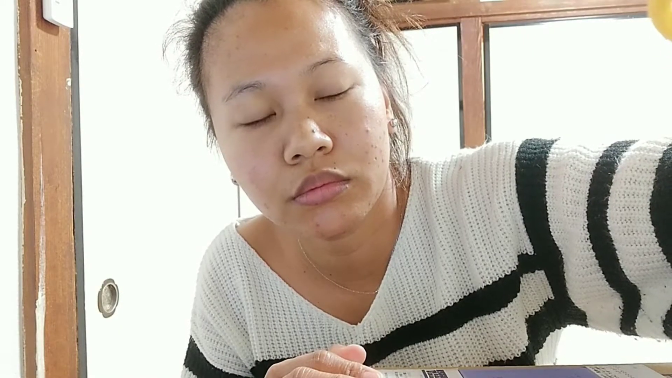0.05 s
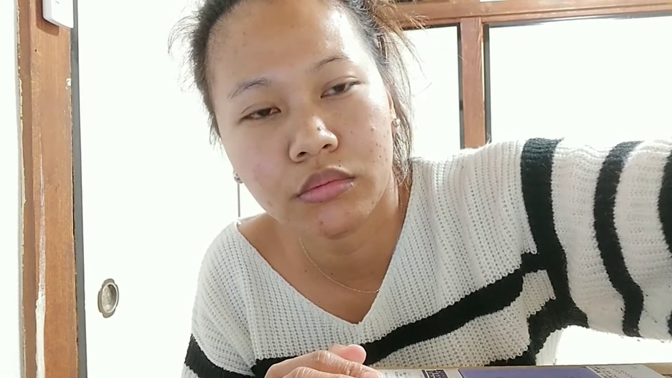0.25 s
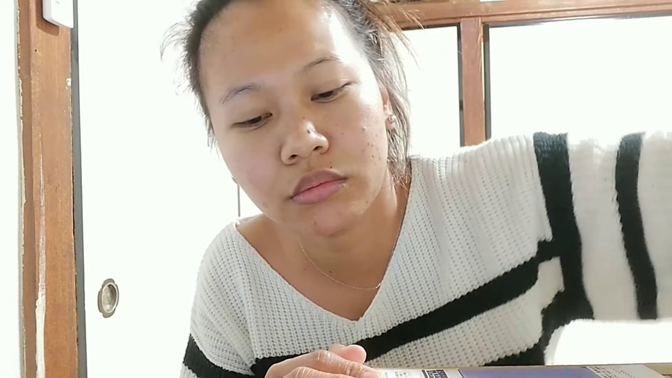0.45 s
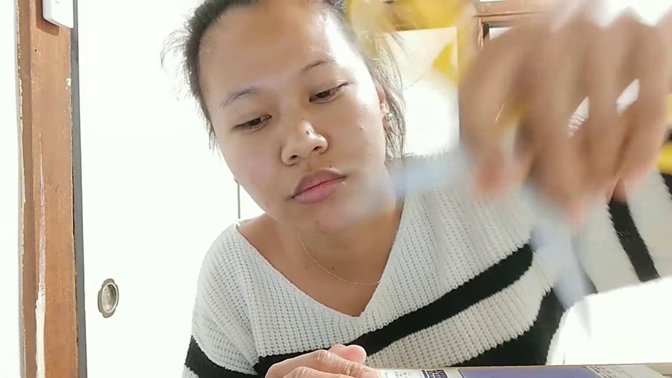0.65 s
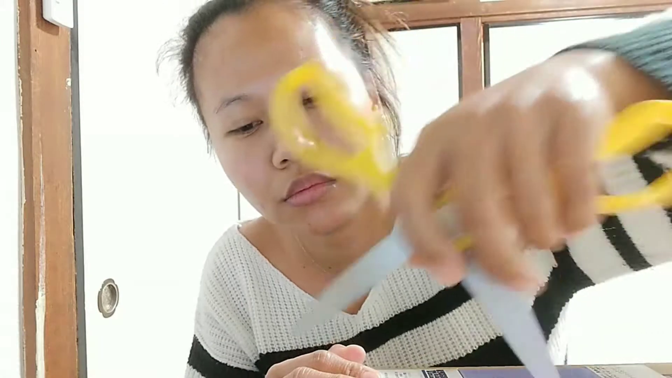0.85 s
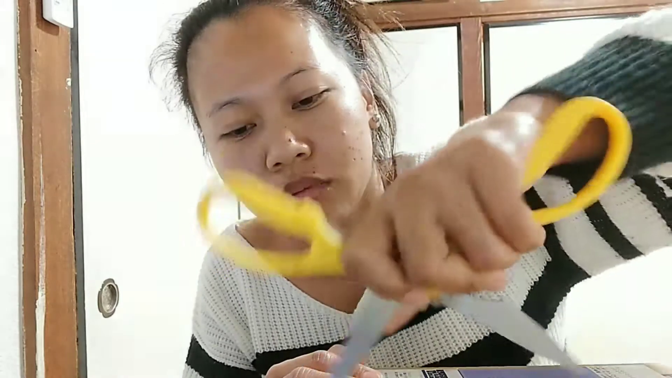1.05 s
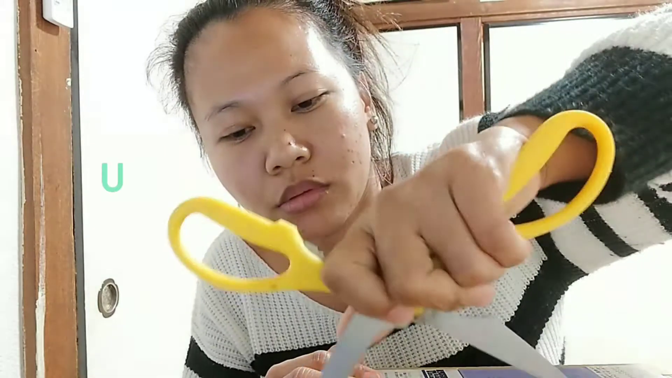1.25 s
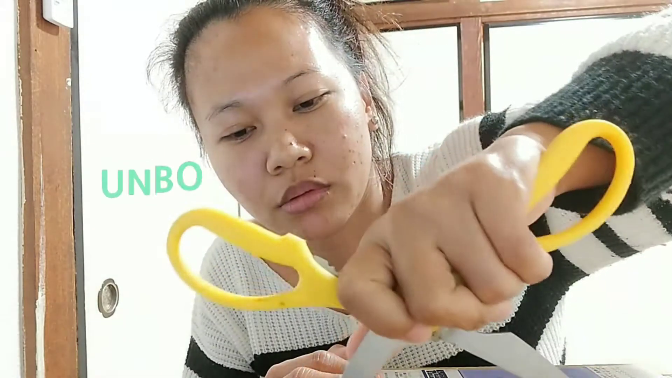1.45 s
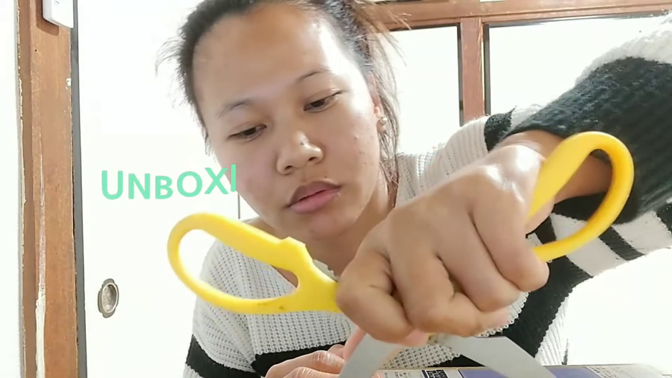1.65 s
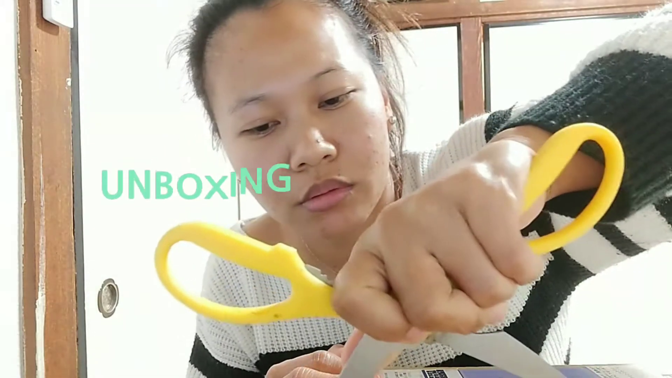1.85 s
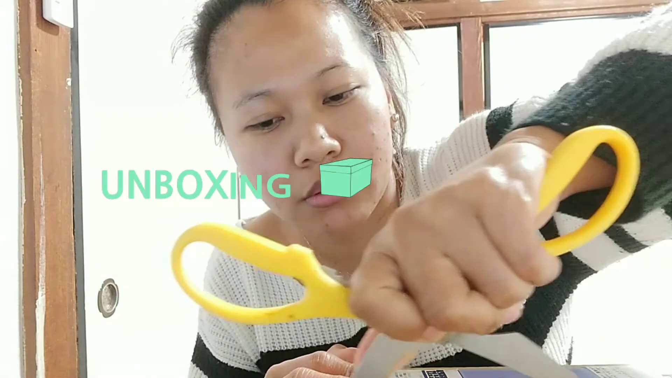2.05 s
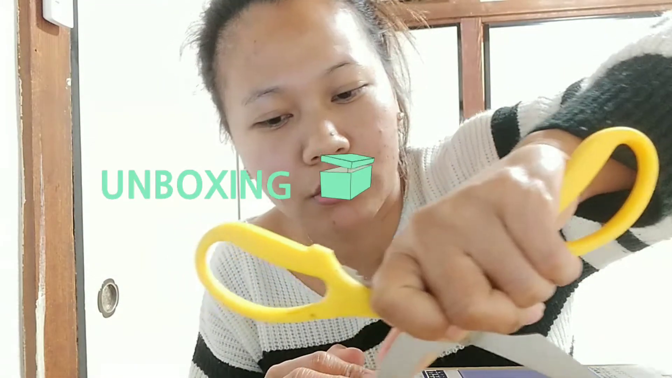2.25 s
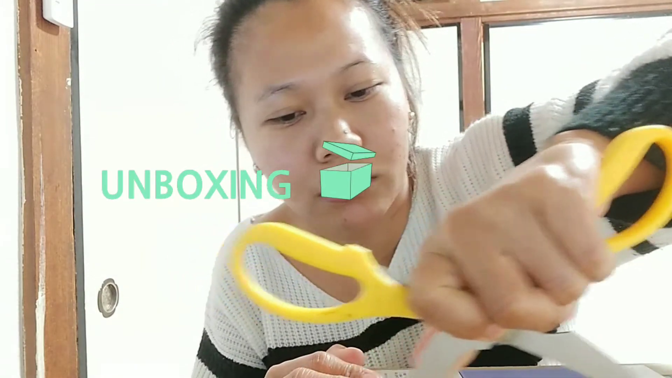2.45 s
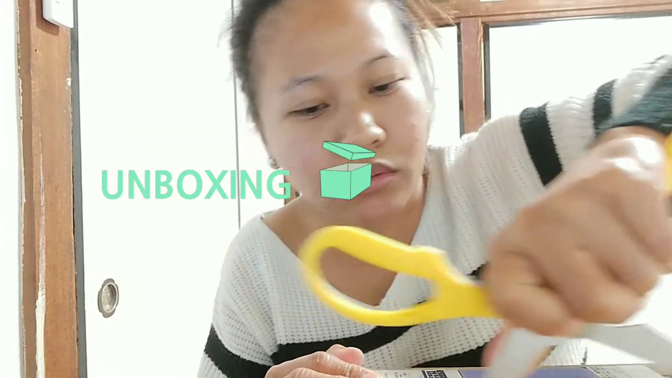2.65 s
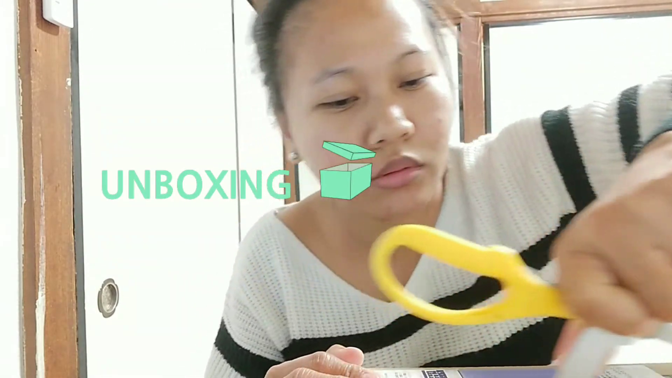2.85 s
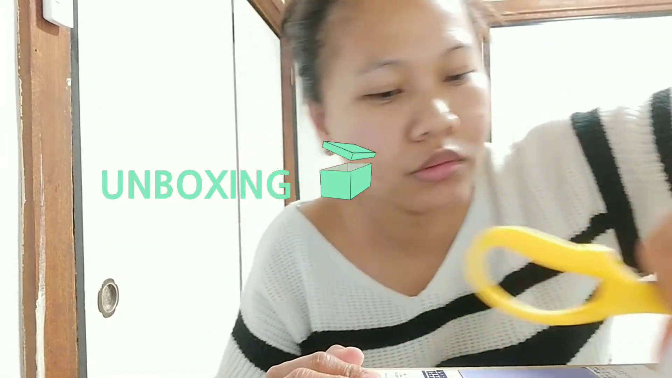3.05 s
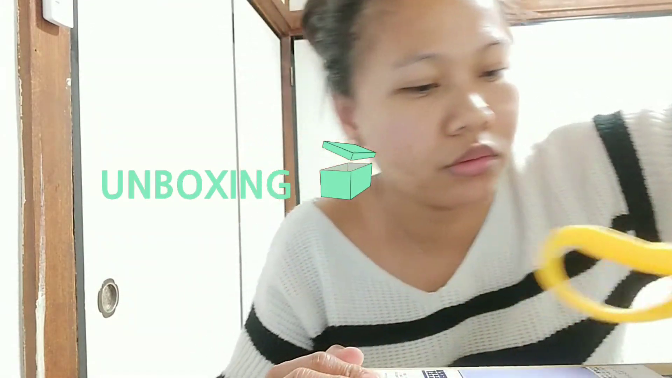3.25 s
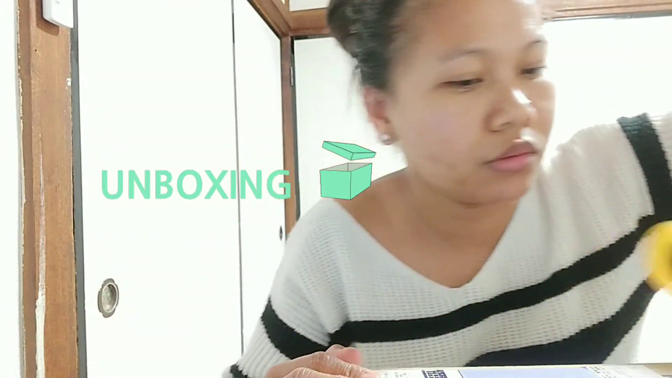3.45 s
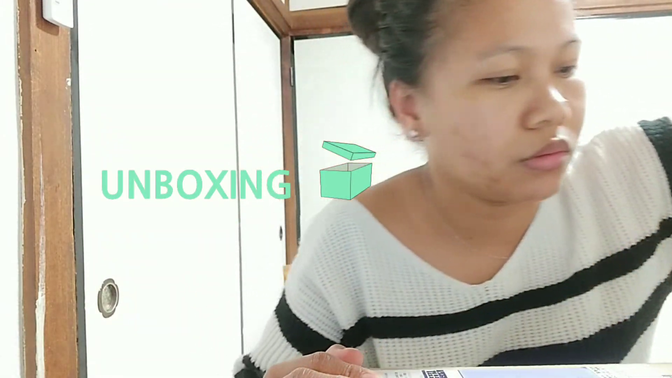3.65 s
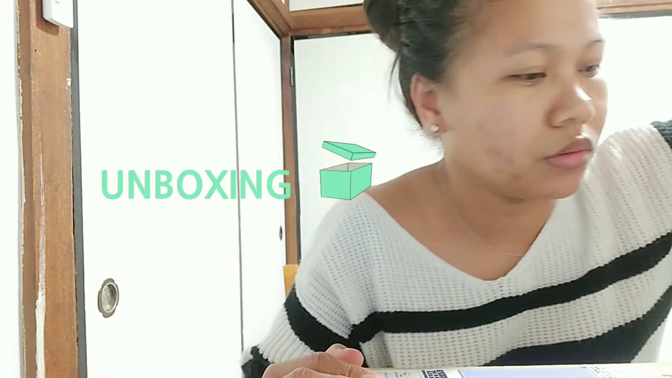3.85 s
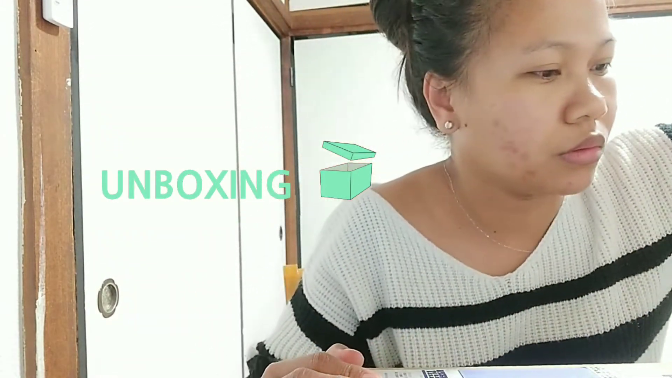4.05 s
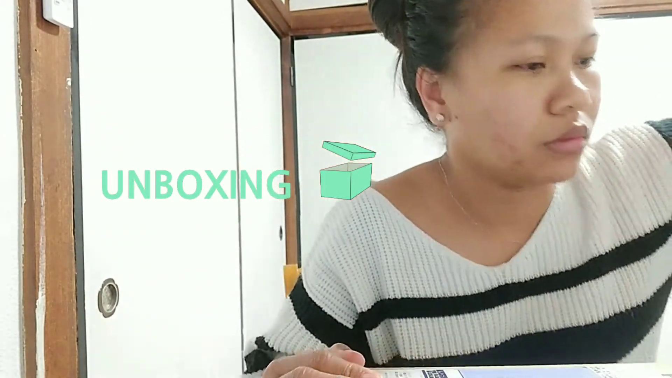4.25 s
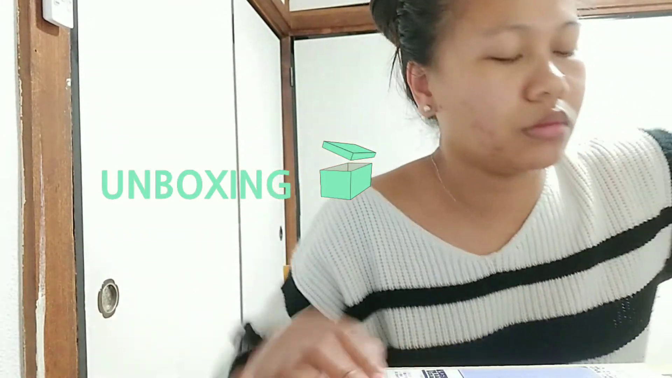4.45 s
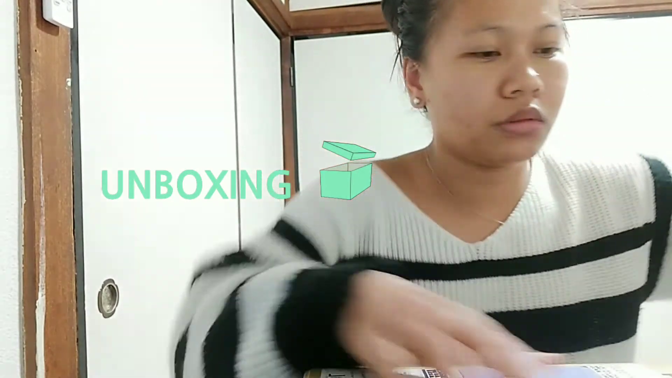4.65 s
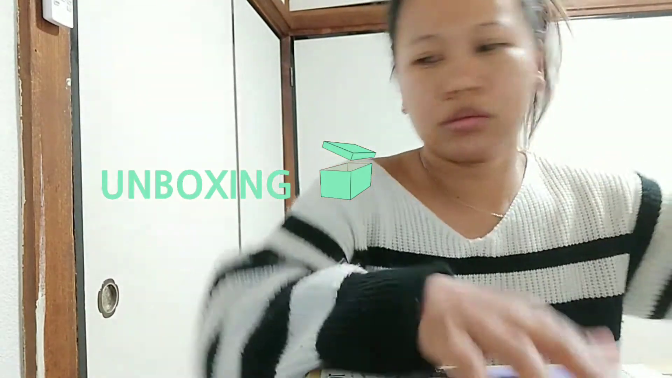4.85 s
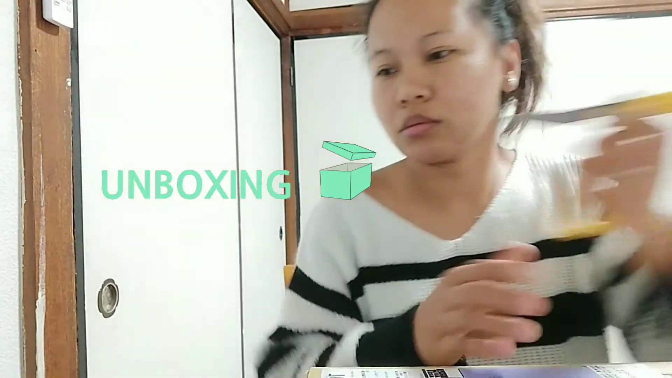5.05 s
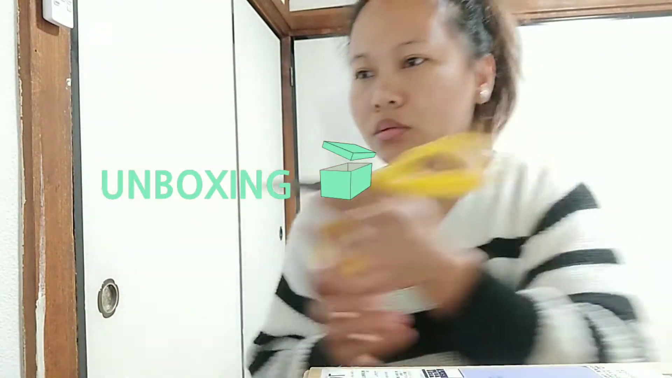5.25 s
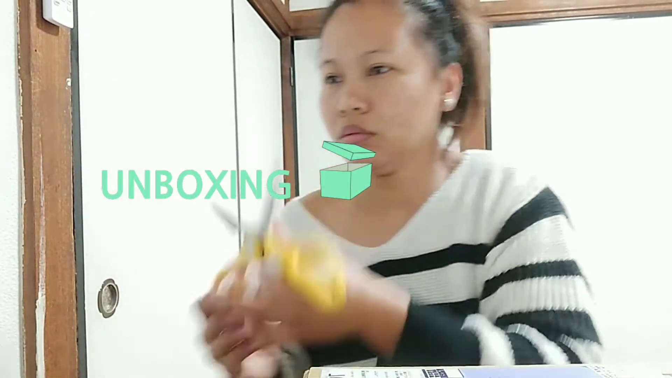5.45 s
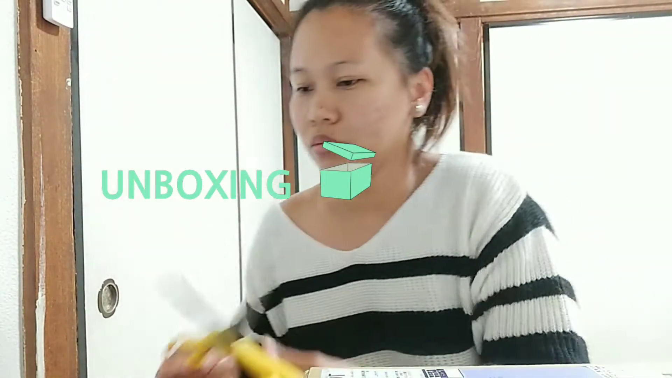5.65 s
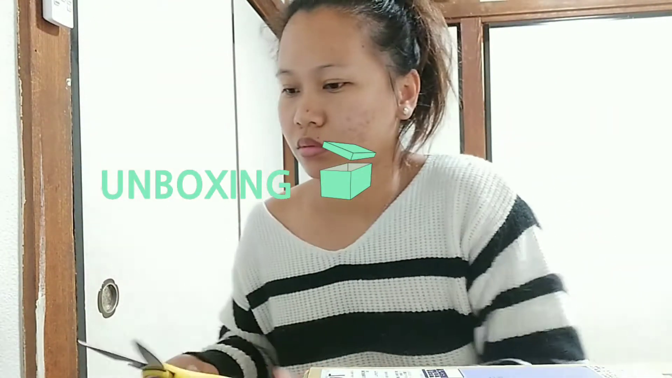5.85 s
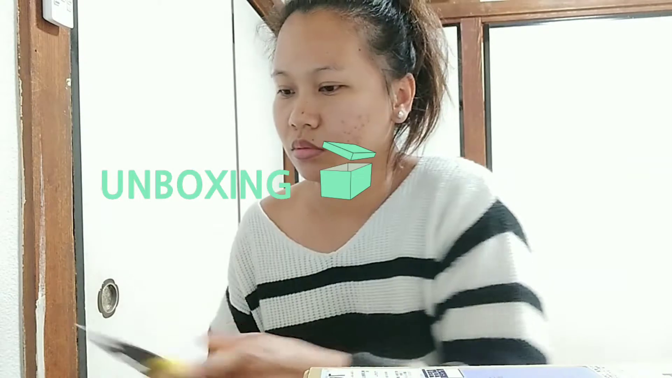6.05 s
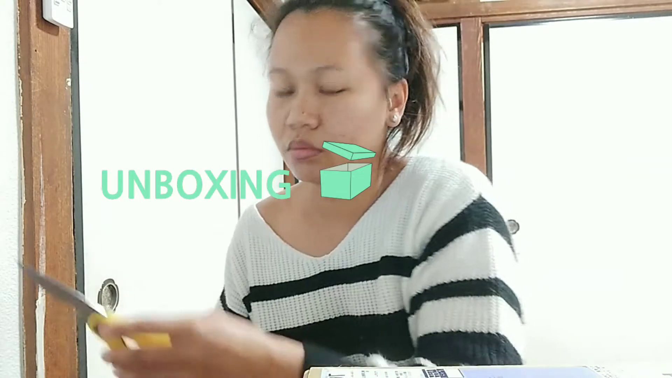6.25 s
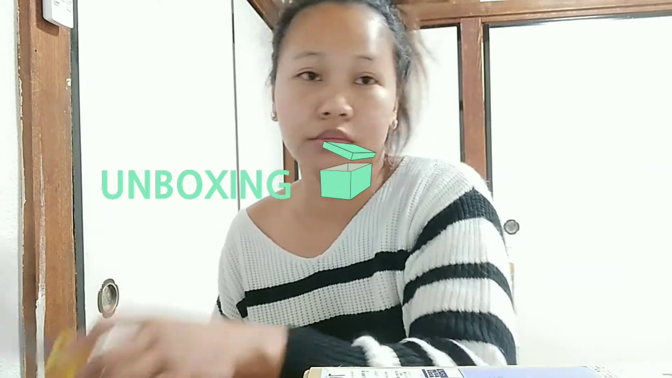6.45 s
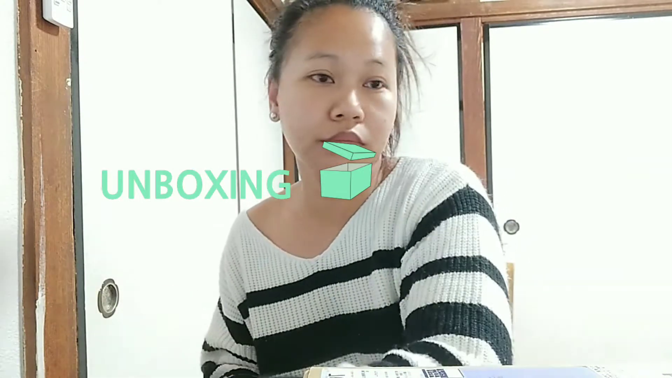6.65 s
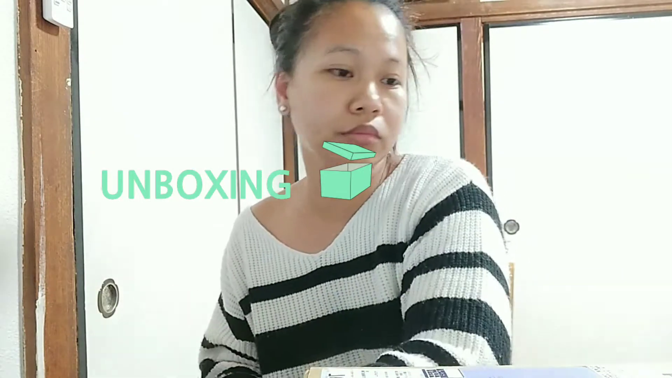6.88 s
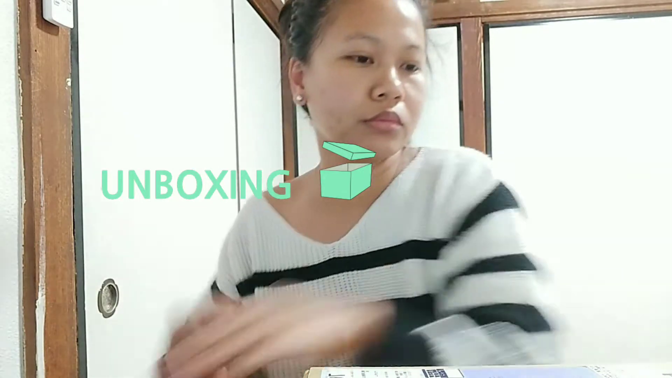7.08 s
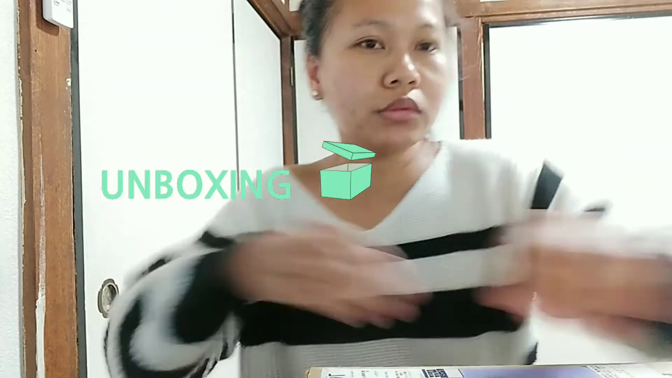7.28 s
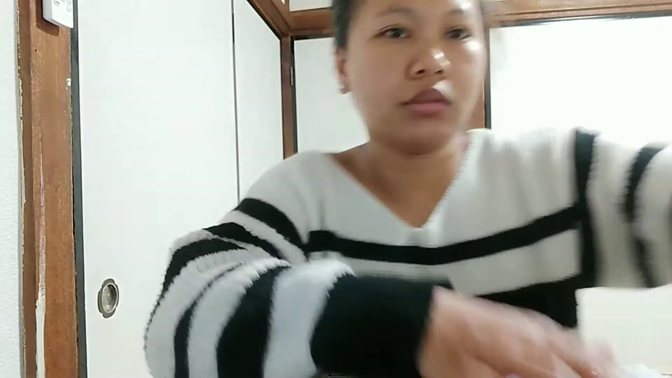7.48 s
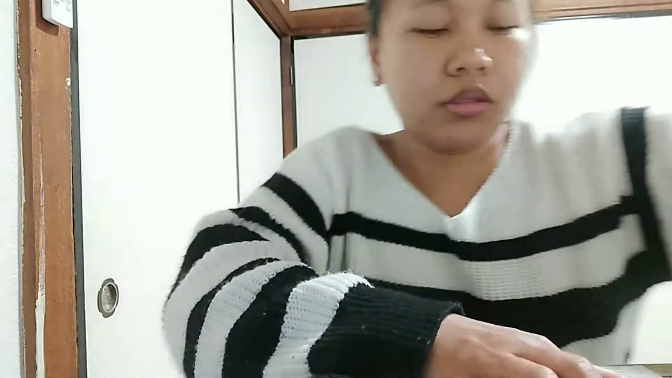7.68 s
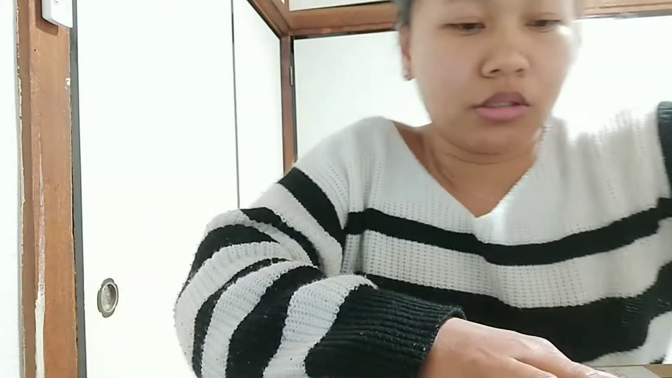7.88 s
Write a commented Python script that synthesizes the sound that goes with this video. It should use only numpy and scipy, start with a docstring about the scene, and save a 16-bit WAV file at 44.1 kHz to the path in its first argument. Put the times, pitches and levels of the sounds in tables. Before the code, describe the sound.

A faint, low engine idle from outside and a light hiss run throughout, heard through a phone microphone indoors. From about 0.8 to 2 seconds, scissors and fingers tap softly on a cardboard box close by. At 2.2 seconds a blade starts into the tape with small catches, then glides in a bright, rasping tear from 2.8 seconds. From 3.5 to 4.5 seconds it jerks along, louder, scraping the flaps and drawing hollow thumps from the box, and leaves with a dull knock. A hand slides softly off the cardboard until about 5.2 seconds. Light scissor clicks and ticks follow between 5.3 and 6.7 seconds. Around 6.9 to 7.2 seconds, three quick, sharp slaps thump the box and leave the table ringing faintly. At about 7.7 seconds a hand drops on the box with soft low thuds and a brief rub.

```python
"""Faint taps of scissors and fingers on a cardboard box, close by indoors, over an engine idling outside.
A blade slits the tape, gliding, then jerking: one force tears the fibres and shakes flaps and box.
A hand slides off (skin friction) and the scissors click. Three slaps thump the box and ring the table;
a hand drops on the box. The engine is a sum of harmonics of its cycle rate. A phone picks it all up."""
import sys
import numpy as np
from scipy import signal
from scipy.fft import rfft, irfft, next_fast_len
from scipy.io import wavfile
from scipy.ndimage import uniform_filter1d, map_coordinates

SR = 44100
rng = np.random.default_rng(int(sys.argv[2]) if len(sys.argv) > 2 else 0)


def dump(signal):
    """Clip the signal to [-1, 1] and save it as 16-bit WAV at the path in sys.argv[1]."""
    limited = np.clip(np.atleast_2d(signal).T, -1, 1)
    pcm = np.round(limited * 32767).astype(np.int16)
    wavfile.write(sys.argv[1], SR, pcm)


N = 349272

# flap resonances: f/Hz, width/Hz, level/dB
FLAP_MODES = [(330, 23, 2), (496, 41, 2.5), (643, 42, 8), (1033, 1800, -2), (1268, 350, -0.5),
              (1882, 93, -2.5), (2329, 22, 4.5)]
# box resonances, two of the air, then two of the walls: f/Hz, width/Hz, level/dB
BOX_MODES = [(83, 12, -4), (136.8, 18.7, 7.5), (190.3, 22, -3), (243, 127, -12.5)]
# table-top modes: f/Hz, level/dB, t60/s
TABLE_MODES = [(248, -28, .5), (272, -31, .4), (472, -30, .55)]


def cut():
    """One blade force, glide plus jerks, tears the tape and shakes flaps and box."""
    # steady push: t/s, tear level/dB, boom level/dB, walls re air/dB
    push = [(2.15, -100, -94, 4), (2.24, -62.5, -51.5, -0.5), (2.42, -55.5, -53.5, 9),
            (2.81, -39.5, -38.5, 1.5), (2.95, -42, -32, -3.5), (3.15, -40, -39, 7), (3.3, -38, -33.5, 10.5),
            (3.46, -40, -27.5, -3.5), (3.53, -37, -32, 6), (3.56, -51.5, -33.5, 10),
            (3.65, -37.5, -29, 1.5), (3.85, -51, -28, -1), (4.1, -54, -35, 4.5), (4.16, -48, -30.5, -2),
            (4.29, -54.5, -35.5, -33), (4.43, -47, -38, 2), (4.5, -50.5, -33, -11), (4.55, -81, -52, 9),
            (4.7, -100, -85, 6.5)]
    # jerks through the tape: t/s, rise/s, hold/s, level/dB
    jerks = [(2.218, 0.0028, 0.0041, -62), (2.255, 0.0034, 0.013, -51.5), (2.278, .001, 0.022, -49.5),
             (2.338, 0.0018, 0.037, -55), (2.374, 0.0078, 0.03, -44.5), (2.407, .002, 0.032, -48.5),
             (2.519, .002, 0.0086, -46.5), (2.551, .002, 0.023, -47.5), (3.137, 0.012, 0.013, -38),
             (3.438, 0.0023, 0.02, -38), (3.53, 0.012, 0.0064, -35), (3.565, .002, 0.04, -37),
             (3.603, 0.006, 0.015, -31.5), (3.64, 0.023, 0.0076, -37.5), (3.68, 0.0013, 0.025, -31.5),
             (3.711, 0.019, 0.01, -33.5), (3.757, 0.0017, 0.025, -38.5), (3.806, 0.0077, 0.0082, -30.5),
             (3.891, 0.00089, 0.017, -40), (3.913, 0.013, 0.0059, -39), (3.937, 0.0069, 0.0076, -31),
             (3.969, 0.016, 0.023, -35), (3.989, 0.0071, 0.016, -33.5), (4.043, 0.01, 0.0061, -27.5),
             (4.083, 0.0027, 0.0081, -29), (4.094, .001, 0.012, -26.5), (4.104, .015, 0.018, -32),
             (4.132, 0.019, 0.025, -37), (4.191, 0.0046, 0.013, -33.5), (4.225, 0.0088, .002, -33.5),
             (4.236, 0.012, 0.016, -37.5), (4.273, 0.0092, 0.013, -35), (4.314, 0.0038, 0.027, -35.5),
             (4.355, 0.01, 0.015, -36), (4.395, 0.011, 0.03, -35), (4.466, 0.0093, 0.012, -32)]
    glide_db, boom_db, walls_db = curves(push)
    power = amp(glide_db + 1.47 * wobble(45)) ** 2
    for at_s, rise_s, hold_s, db in jerks:
        add(power, at_s, (amp(db) * burst(hold_s, rise_s, t60_s=0.02)) ** 2)
    direct = tape_tear(np.sqrt(power)) + flap_scrape(power, boom_db)
    # drifting reflections off hand and flaps
    near = sum(0.18 * delayed(direct, ms + 0.163 * wobble(4)) for ms in (1.7, 2.9))
    return direct + near + amp(-3) * box_boom(power, boom_db, walls_db)


def tape_tear(force):
    """Fibres part under the blade; the colour shifts as the slit grows, and the lid reflects it."""
    # middle peak of the tear: t/s, pitch ratio
    bend = [(2.5, 0.91), (2.85, 0.98), (3.3, 0.98), (3.65, .93), (4.5, 0.91)]
    # lid reflection, moving with the blade: t/s, delay/ms
    lid_echo = [(2.6, .663), (2.92, .705), (3.22, .733), (3.5, .753), (3.7, .778), (4.12, .74), (4.19, .56)]
    low_ratio, high_ratio = 0.93, 1.03
    fibres = force * patchy(grit(depth_db=1.8, rate_hz=380), depth_db=1.5)
    blend = np.clip((curves(bend)[0] - low_ratio) / (high_ratio - low_ratio), 0, 1)
    low = filtered(fibres, lambda hz: tear_gain(hz, low_ratio))
    high = filtered(fibres, lambda hz: tear_gain(hz, high_ratio))
    tear = (1 - blend) * low + blend * high
    dulled = uniform_filter1d(tear, size=2)  # card reflects less treble
    return tear + 0.56 * delayed(dulled, curves(lid_echo)[0] + 0.0067 * wobble(9))


def tear_gain(hz, ratio=1):
    """Tearing colour, all but its top peak shifted by ratio."""
    # tear spectrum with the phone's two treble peaks: f/Hz, density/dB
    spectrum = [(1290, -41), (2200, -11), (2730, -18), (3440, -9.5), (4200, -12), (5720, -6.5), (6900, 4),
                (7900, -1.5), (8660, -6.5), (11100, -13), (13000, -11), (15100, -2.5), (16000, -3.5)]
    shift = 1 + (ratio - 1) / (1 + (hz / 11000) ** 8)
    return amp(log_interp(spectrum, hz / shift))


def flap_scrape(power, boom_db):
    """The flaps scrape with the blade and go on between jerks, louder as the boom grows."""
    linger_s, linger_share = 0.035, 0.11
    lingering = uniform_filter1d(power, round(linger_s * SR), origin=round(linger_s * SR / 3))
    force = np.sqrt(power + linger_share * np.abs(lingering))
    level_db = -2 + 0.29 * (boom_db + 34)
    scrape = amp(level_db) * force * grit(depth_db=1.93, rate_hz=200)
    return filtered(scrape, body(FLAP_MODES, top_hz=3150))


def box_boom(power, boom_db, walls_db):
    """The jerks shake the enclosed air and the walls."""
    slow_power = np.abs(uniform_filter1d(power, SR // 8)) + 1e-12
    jerk_pattern = (power / slow_power) ** 0.46  # slow level removed, peaks evened out
    shake = amp(boom_db) * jerk_pattern * grit(depth_db=1.2, rate_hz=60)
    cavity = filtered(shake, body(BOX_MODES[:2], top_hz=403))
    walls = filtered(amp(walls_db - 3.5) * shake, body(BOX_MODES[2:], top_hz=820))
    return cavity + walls


def slaps():
    """Each contact builds for a few ms, cracks, thumps the box and leaves the table ringing faintly."""
    # t/s, level/dB, hollow f/Hz, hollow/dB, crack f/Hz, crack/dB, bright/dB, t60/s
    hits = [(6.895, -24.5, 715, 12, 1470, 8.5, -16, 0.06),
            (7.0200, -26.5, 696, 11, 2420, 14.5, -9.5, 0.065),
            (7.1440, -21, 640, 13, 1600, 8, -13.5, 0.077)]
    # palm resonances: f/Hz, width/Hz, level/dB
    palm_modes = [(238, 86, 10), (1004, 240, 3), (1358, 300, 8.5), (2170, 220, 4.5)]
    contact_s, hollow_width_hz, crack_width_hz = 0.0053, 210, 250
    out = np.zeros(N)
    for at_s, db, hollow_hz, hollow_db, crack_hz, crack_db, bright_db, t60_s in hits:
        env = burst(hold_s=0.0018, rise_s=0.0018, t60_s=t60_s)
        blow = 12 * signal.unit_impulse(len(env), round(contact_s * SR))
        own_modes = [(hollow_hz, hollow_width_hz, hollow_db), (crack_hz, crack_width_hz, crack_db)]
        palm = filtered(env * rng.standard_normal(len(env)) + blow,
                        body(palm_modes + own_modes, top_hz=2680))
        palm *= np.linalg.norm(env) / np.linalg.norm(palm)
        bright_env = amp(bright_db) * burst(hold_s=0.0043, rise_s=0.00025, t60_s=0.041)
        bright = filtered(bright_env * rng.standard_normal(len(env)), tear_gain)
        add(out, at_s, amp(db) * (palm + bright))
        add(out, at_s + contact_s, amp(db - 9) * thud(top_hz=600))
        add(out, at_s, ring(TABLE_MODES, db))
    return out


def touches():
    """Scissors, fingers and card meet in puffs of grit: a bright part and a pitched snap."""
    # t/s, bright/dB, snap/dB, snap f/Hz, nominal length/ms
    contacts = [(0.814, -59.5, -60, 2300, 14), (0.883, -61.5, -61, 2500, 4.3), (1.1492, -58, -51, 490, 4.2),
                (1.263, -74, -63.5, 1080, 6.5), (1.6145, -67.5, -45.5, 380, 6.3),
                (1.7358, -71.5, -58, 476, 27), (1.742, -83, -65.5, 1870, 23), (1.951, -74, -69, 1920, 23),
                (1.995, -69, -59, 515, 5.1), (3.813, -58, -31.5, 580, 11), (4.097, -49, -30.5, 1230, 8),
                (4.512, -47, -41.5, 750, 8.6), (4.642, -51.5, -56.5, 3970, 4.7),
                (5.097, -66, -65.5, 3940, 31), (5.125, -61, -66, 3920, 9.7), (5.261, -77, -50, 790, 3),
                (5.263, -84, -58, 2120, 2.7), (5.5707, -81, -53.5, 2010, 3.6),
                (5.8561, -41.5, -69, 3900, 3.9), (6.2502, -50, -66, 1700, 12),
                (6.264, -55.5, -47, 13550, 11.5), (6.314, -54.5, -78, 2500, 11.7),
                (6.4166, -64, -68, 1350, 5.5), (6.696, -59, -55, 2860, 8.8), (7.1382, -53, -62, 3000, 6.7),
                (7.544, -75, -68.5, 1630, 18), (7.6985, -51, -41.5, 456, 3), (7.731, -54, -51.5, 720, 5.1),
                (7.7801, -53.5, -44.5, 430, 11.4)]
    # bright part: f/Hz, density/dB
    spectrum = [(1180, -50), (2180, -9.5), (3510, -11), (4750, -7), (5550, -9.5), (7380, 3.5), (9650, -14),
                (15800, -5)]
    bright_env, snaps = np.zeros(N), np.zeros(N)
    for at_s, bright_db, snap_db, hz, length_ms in contacts:
        rise_s = 0.0007 * (1 + (length_ms / 14) ** 3)  # long rubs start softly
        env = burst(0.5 * length_ms / 1000, rise_s, t60_s=5.3 * length_ms / 1000)
        add(bright_env, at_s, amp(bright_db) * env)
        narrow = signal.iirpeak(hz, Q=2.6, fs=SR)
        wide = signal.iirpeak(hz, Q=max(0.45, 4 * hz / SR), fs=SR)
        puff = env * rng.standard_normal(len(env))
        snap = signal.lfilter(*narrow, signal.lfilter(*wide, puff))
        add(snaps, at_s, amp(snap_db) * snap * np.linalg.norm(env) / np.linalg.norm(snap))
    bright = bright_env * grit(depth_db=3.5, rate_hz=450)
    return snaps + filtered(bright, lambda hz: amp(log_interp(spectrum, hz)))


def thumps():
    """Soft pushes excite the box's low modes."""
    # t/s, peak/dB
    pushes = [(1.15, -54), (1.6149, -40.5), (1.748, -54), (1.965, -48), (3.813, -21), (4.003, -20.5),
              (4.091, -29), (4.284, -22.5), (4.934, -45), (4.951, -44), (7.6995, -29), (7.736, -38),
              (7.763, -29.5), (7.787, -29.5), (7.806, -33)]
    out, pulse = np.zeros(N), thud(top_hz=210)
    for at_s, db in pushes:
        add(out, at_s, -amp(db) * pulse)
    return out


def blade_exit():
    """The blade leaves the card: a dull knock at the table's top mode, which rings on faintly."""
    hz, db, t60_s = max(TABLE_MODES)
    knock = (0.98 * hz, db + 16, 0.1)
    out = np.zeros(N)
    add(out, at_s=4.513, x=ring([(hz, db, t60_s), knock], db=-22))
    return out


def hand_slide():
    """Strokes swell and fade: friction grit through the resonances of skin and flaps."""
    # t/s, length/s, skin/dB, flaps/dB
    strokes = [(4.532, 0.43, -62, -67), (4.91, 0.14, -61.5, -77), (5.038, 0.14, -64, -85),
               (7.653, 0.079, -64.5, -92), (7.731, 0.22, -53, -58.5)]
    # sliding skin: f/Hz, width/Hz, level/dB
    skin_modes = [(190, 120, -4), (664, 1670, 7.5), (1410, 130, 3), (2050, 300, -13), (3840, 380, 1.5),
                  (6650, 1100, 5), (15400, 6100, 1.5)]
    at_s, length_s, skin_db, flaps_db = np.transpose(strokes)[:, :, None]
    progress = np.clip((np.arange(N) / SR - at_s) / length_s, 0, 1)
    swell = np.abs(np.sin(np.pi * progress ** 0.65)) ** 0.75 * amp(2.0 * wobble(30))
    skin = filtered(grit(depth_db=2.0, rate_hz=300), body(skin_modes, top_hz=30000))
    flaps = filtered(grit(depth_db=11.0, rate_hz=130), body(FLAP_MODES, top_hz=3000))
    return np.sum(swell * (amp(skin_db) * skin + amp(flaps_db) * flaps), axis=0)


def phone_shake():
    """The phone shakes as the hand drops: a slow sub-bass sway swells in and lasts to the end."""
    at_s, rise_s = 7.72, 0.034
    return amp(-49) * np.clip((np.arange(N) / SR - at_s) / rise_s, 0, 1) * unit_rms(wobble(55))


def engine():
    """Idle: harmonics of the engine cycle, each swelling slowly on its own."""
    # t/s, level/dB, deep share/0-1
    course = [(0, -70.5, 0), (.8, -66.5, 0.17), (1.5, -63, 0.06), (2.2, -63.5, 0.37), (4.6, -55, 0.6),
              (5.3, -59, 0.9), (5.9, -60.5, 0.4), (6.5, -65.5, 0.7), (7.2, -58, 0.5), (7.92, -68, 0.37)]
    # thin timbre: harmonic, level/dB
    thin = [(1, -5.5), (2, -4), (3, -2), (4, -20.5), (5, -16), (6, -4), (7, -11.5), (8, -5.5), (9, -16),
            (11, -9), (13, -4.5), (16, -7), (17, -11.5)]
    # deep timbre: harmonic, level/dB
    deep = [(1, -10), (2, -10), (3, -13.5), (4, -7), (5, 2), (6, -0.5), (7, 9.5), (8, -2), (9, -2),
            (11, -1.5), (13, -10), (16, -18), (17, -23)]
    idle_hz, sag_hz_per_s = 12.035, 0.03
    cycle_hz = idle_hz - sag_hz_per_s * np.arange(N) / SR
    phase = 2 * np.pi * np.cumsum(cycle_hz) / SR
    level_db, deep_share = curves(course)
    drone = np.zeros(N)
    for (k, thin_db), (_, deep_db) in zip(thin, deep):
        harmonic_db = (1.5 - deep_share) * thin_db + deep_share * deep_db + 2.3 * wobble(1.41)
        drone += amp(harmonic_db) * np.sin(k * phase + 1.38 * wobble(0.515))
    running_rms = np.sqrt(np.abs(uniform_filter1d(drone ** 2, SR)))
    return amp(level_db) * drone / running_rms


def hiss():
    """Room and phone noise, wavering slightly."""
    # f/Hz, density/dB
    spectrum = [(20, -3), (53, 0), (107, -14.5), (154, -4.5), (182, -15.5), (241, -20.5), (347, -25),
                (698, -24.5), (923, -21.5), (1220, -25.5), (1810, -28.5), (4300, -32), (14700, -32)]
    noise = amp(1.35 * wobble(4.9)) * rng.standard_normal(N)
    return amp(-64) * filtered(noise, lambda hz: amp(log_interp(spectrum, hz)))


def room(x):
    """Reverberation, each frequency dying at its own speed; a fresh tail every 0.25 s."""
    # f/Hz, t60/s
    decay = [(200, 0.4), (1000, 0.28), (3000, 0.23), (8000, 0.24), (16000, 0.14)]
    step, predelay_samples = SR // 4, 300
    out = np.zeros(N + 2 * SR)
    for start in range(0, N, step):
        hz, t, bins = signal.stft(rng.standard_normal(SR // 2), SR, nperseg=256)
        fade = amp(-60 * t / log_interp(decay, hz)[:, None])
        tail = signal.istft(bins * fade, SR, nperseg=256)[1]
        wet = signal.fftconvolve(x[start:start + step], tail / np.linalg.norm(tail))
        out[start + predelay_samples:][:len(wet)] += wet
    return out[:N]


def body(modes, top_hz, bass_hz=72.5):
    """Causal response of summed resonances, radiating little below bass_hz and above top_hz."""
    def response(f):
        peaks = sum(amp(db) * 1j * f * width / (hz * hz - f * f + 1j * f * width)
                    for hz, width, db in modes)
        return peaks / (1 + 1j * f / top_hz) ** 2 * (1j * f / (bass_hz + 1j * f)) ** 2
    return response


def thud(top_hz):
    """Box response to one push, peak 1."""
    x = filtered(signal.unit_impulse(SR // 8), body(BOX_MODES, top_hz))
    return x / np.abs(x).max()


def ring(modes, db):
    """Modes decaying after a blow."""
    t = np.arange(SR // 2) / SR
    return sum(amp(db + mode_db - 60 * t / t60_s) * np.sin(2 * np.pi * hz * t)
               for hz, mode_db, t60_s in modes)


def burst(hold_s, rise_s, t60_s):
    """Rise, hold, decay envelope."""
    t = np.arange(SR // 8) / SR
    return np.minimum(t / rise_s, 1) * amp(-60 * np.maximum(t - rise_s - hold_s, 0) / t60_s)


def grit(depth_db, rate_hz):
    """Noise that flickers as fibres catch and part."""
    return unit_rms(amp(depth_db * wobble(rate_hz)) * rng.standard_normal(N))


def patchy(x, depth_db):
    """Random colour shifts in patches of about 1 kHz by 40 ms."""
    bins = signal.stft(x, nperseg=256)[2]
    field = uniform_filter1d(rng.standard_normal(bins.shape), size=6, axis=0)
    field = uniform_filter1d(field, size=14, axis=1)
    return signal.istft(bins * amp(depth_db * unit_rms(field)), nperseg=256)[1][:N]


def wobble(rate_hz):
    """Smooth random curve, rate_hz knots a second."""
    knots = int(N * rate_hz / SR) + 4
    grid = np.arange(knots * 6)
    spline = map_coordinates(rng.standard_normal(knots), [grid / 6])
    return np.interp(np.arange(N) * rate_hz / SR * 6, grid, spline)


def filtered(x, response):
    """Apply a frequency response, scaled to keep white-noise power."""
    size = next_fast_len(len(x) + SR // 4)
    gain = response(np.fft.rfftfreq(size, 1 / SR))
    return irfft(rfft(x, size) * gain / np.sqrt(np.mean(np.abs(gain) ** 2)), size)[:len(x)]


def delayed(x, delay_ms):
    return map_coordinates(x, [np.arange(N) - delay_ms * SR / 1000], order=2)


def curves(rows):
    """Per-sample values of each column after t/s."""
    times_s, *columns = np.transpose(rows)
    return [np.interp(np.arange(N) / SR, times_s, column) for column in columns]


def log_interp(points, hz):
    knots_hz, values = np.transpose(points)
    return np.interp(np.log(hz + 1), np.log(knots_hz + 1), values)


def add(track, at_s, x):
    part = track[round(at_s * SR):][:len(x)]
    part += x[:len(part)]


def amp(db):
    return 10 ** (np.asarray(db) / 20)


def unit_rms(x):
    return x / np.sqrt(np.mean(x ** 2) + 1e-20)


def scene():
    """Close sources and their reverberation over engine and hiss, mono."""
    blade = cut()
    hands = touches() + thumps() + blade_exit() + phone_shake() + hand_slide()
    hits = slaps()
    air = hiss()
    wet = room(amp(-16) * blade + amp(-10.5) * hands + amp(-11.5) * hits)
    return (blade + hands + hits + wet + engine() + air)[None]


def record(dry):
    """The phone keeps nothing above its band limit."""
    limit_hz = 15850
    size = next_fast_len(N + 8192)
    passband = np.fft.rfftfreq(size, 1 / SR) < limit_hz
    return irfft(rfft(dry, size) * passband, size)[:, :N]


dry = scene()
out = record(dry)
dump(out)
```